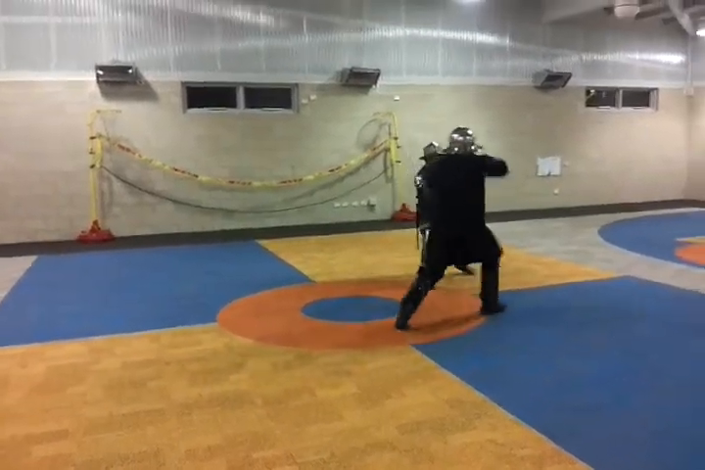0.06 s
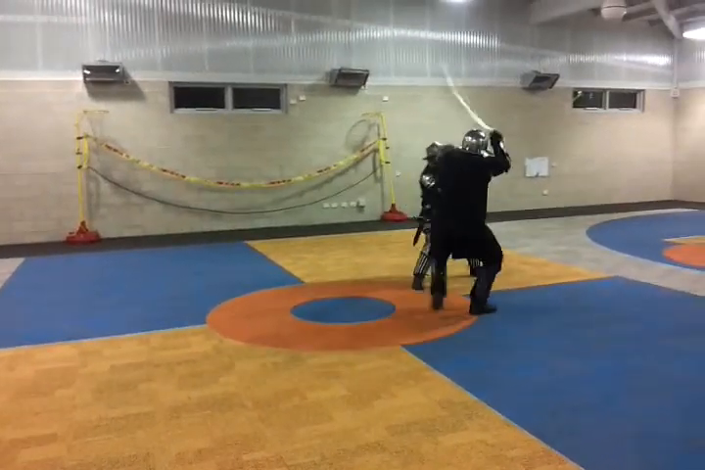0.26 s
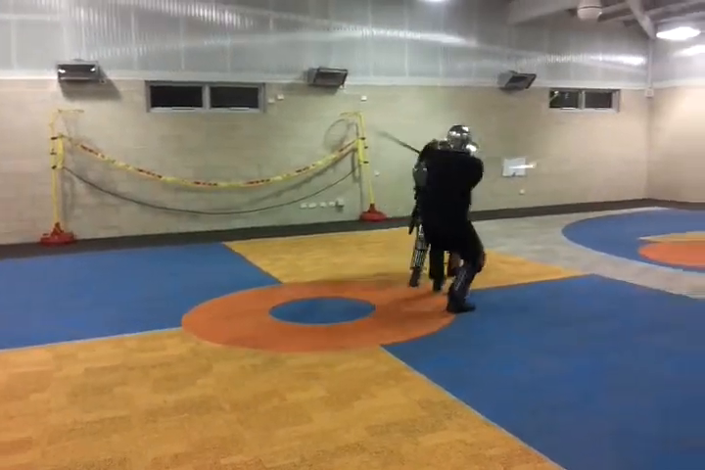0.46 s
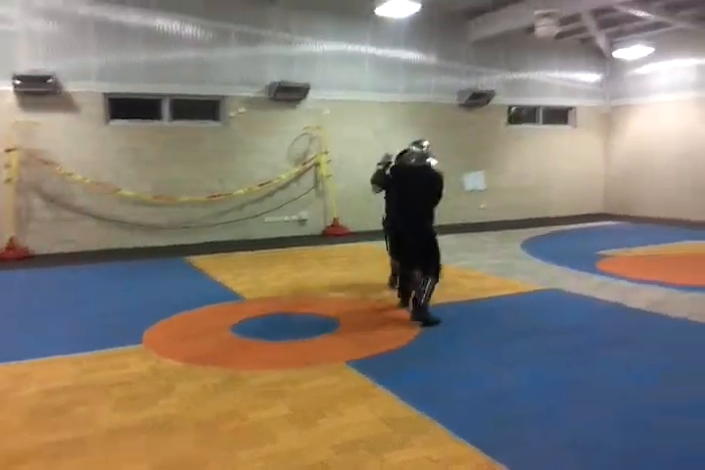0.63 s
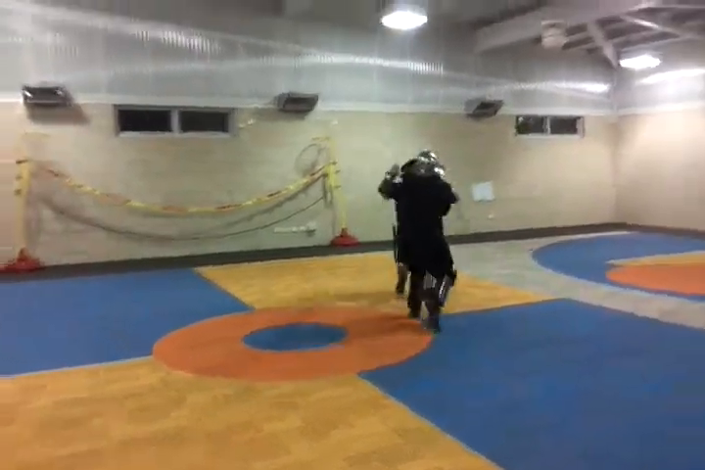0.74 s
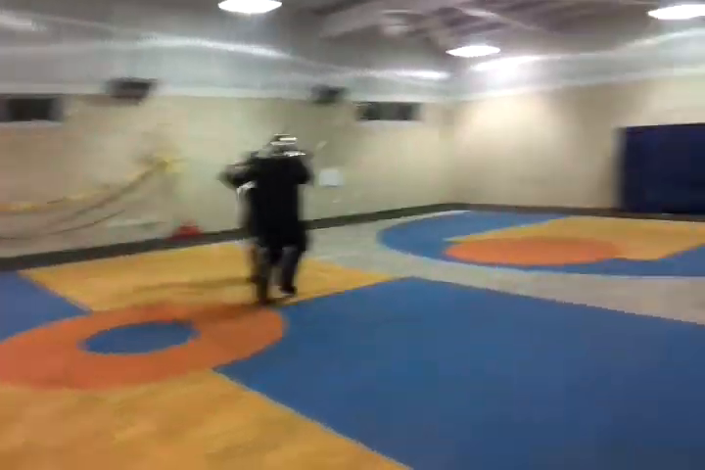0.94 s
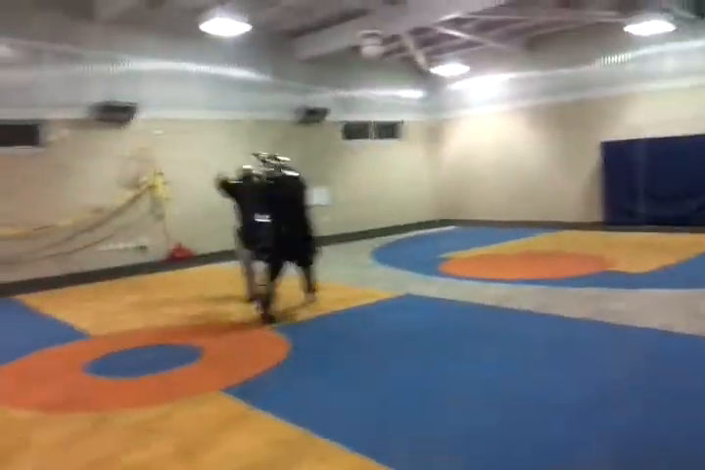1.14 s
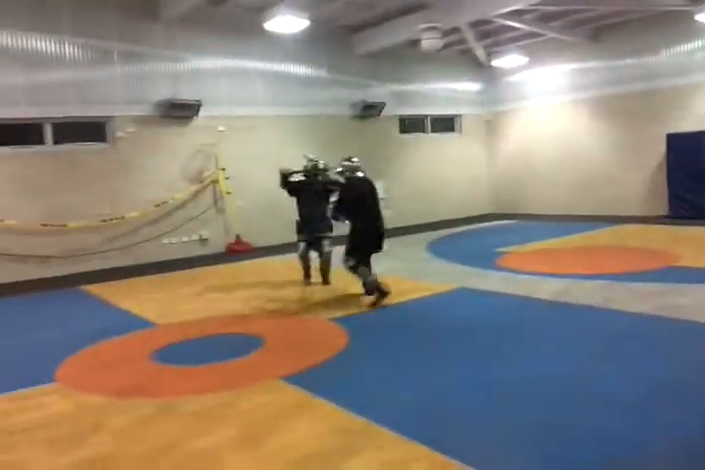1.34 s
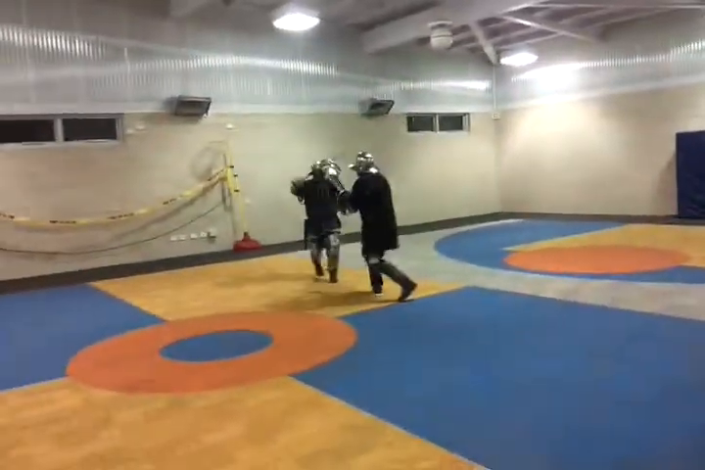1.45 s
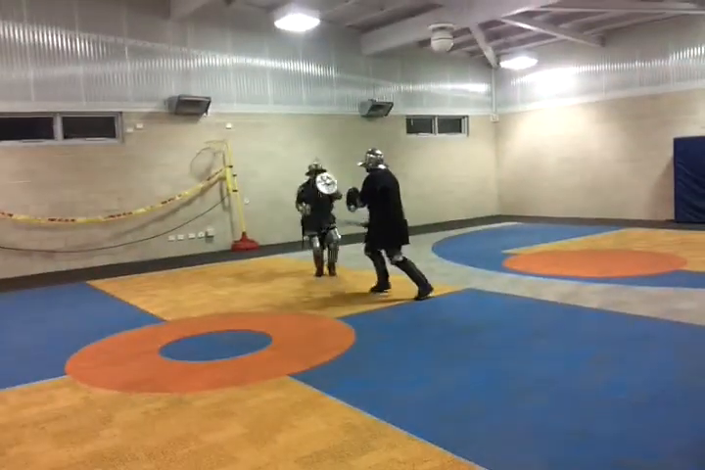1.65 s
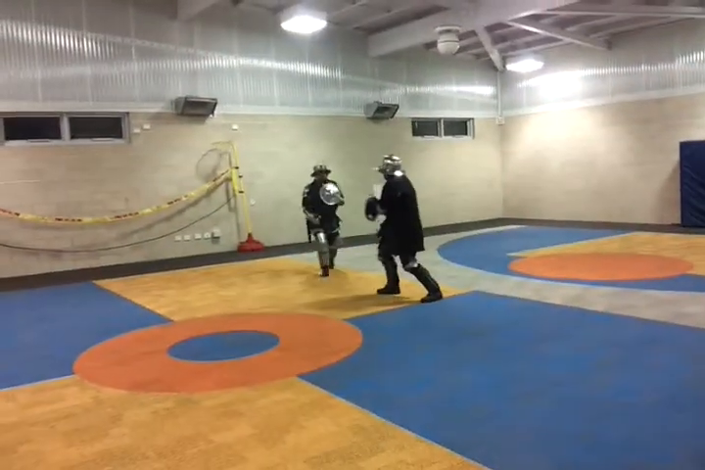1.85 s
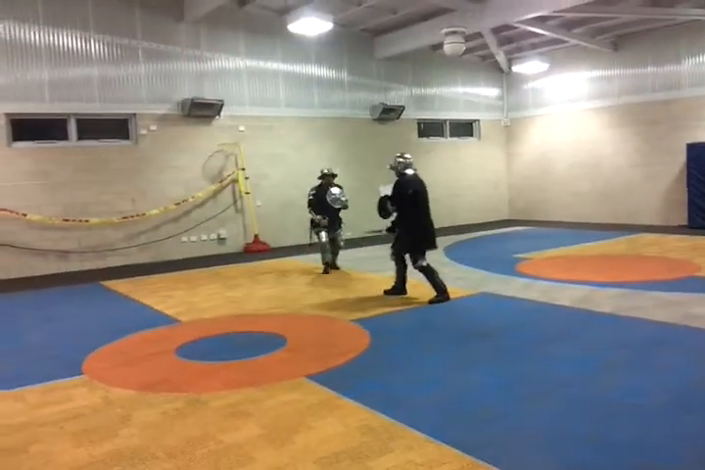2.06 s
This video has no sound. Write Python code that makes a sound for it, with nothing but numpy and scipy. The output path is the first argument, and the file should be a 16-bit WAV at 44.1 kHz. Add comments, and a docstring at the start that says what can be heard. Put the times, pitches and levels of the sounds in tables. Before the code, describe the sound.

Swords clash on steel armour in a large, echoing sports hall. After faint clinks, a loud crack on a small shield and a ringing helmet hit come at 0.25 seconds, with dull footfalls. Two blade clashes follow near 0.7, lighter plate rattles around 1, then a loud flurry from 1.2 to 1.5. The hardest blows distort slightly, and the echo fades into quiet room noise by 2 seconds.

```python
"""Cracks, rattles and ringing steel: two armoured fencers trade blows with sword and buckler.
Each blow is a contact crack, a rattle of plates and the ring of the struck steel; feet thud on the floor.
A large sports hall draws it all out into a long wash that overloads a small narrow-band recorder."""
import sys
import numpy as np
from scipy import signal
from scipy.io import wavfile

SR = 44100
rng = np.random.default_rng(int(sys.argv[2]) if len(sys.argv) > 2 else 0)


def to_wav(sig):
    """Store sig (one row per channel, or 1-D mono) as 16-bit WAV at the path in sys.argv[1].

    Samples outside -1..1 are clipped; the rate is SR.
    """
    pcm = np.clip(np.atleast_2d(sig), -1, 1) * 32767
    pcm = np.round(pcm).astype(np.int16)
    wavfile.write(sys.argv[1], SR, pcm.T)  # frames by channels


N = 92610


def blows():
    """Steel on steel: the contact force drives a clash and a high sizzle; the struck piece rings."""
    # (time [s], piece, ring [dB], clash [dB], clash tilt [dB/octave], rattle decay [s],
    #  sizzle [dB], direct-to-reverb [dB])
    hits = [ (0.043, "buckler", -31, -29, -1, .07, -45, -18),
            (0.189, "plates", -54, -32, -2, 0.017, -46, -0.5),
            (0.238, "buckler", -8.5, 7.5, -1, 0.009, 9, 0), (0.262, "helmet", 1.5, -3.5, -1.5, 0.11, -9, 0),
            (0.677, "sword", -11, 1, 0, 0.018, -5, 3), (0.719, "sword", -8, -7, 2.5, .03, -6, 0),
            (0.944, "plates", -17, -8, 6, .02, -20, 3), (1.019, "plates", -22, -18, 2, .004, -22, 5),
            (1.178, "buckler", -1, 1, 3, .035, -1, 2), (1.234, "plates", -13, -2, 3.5, 0.09, -13.5, 0.5),
            (1.303, "other sword", -25, 5.5, 2, 0.013, 6, -0.5),
            (1.415, "other sword", -9.5, 0.5, 1.5, 0.053, -14, 3),
            (1.527, "plates", -19, -23, 1, 0.03, -7, 1)]
    # spectra (frequency [Hz], level [dB])
    clash_spectrum = [(40, -50), (110, -28), (300, -5), (500, -3), (780, 3), (970, -3), (1230, 3),
                      (1800, -2), (2400, 0), (2950, -7), (3900, -2), (4350, -4), (5500, 0), (7000, 2),
                      (9000, -8)]
    sizzle_spectrum = [(3000, -58.5), (6500, -18.5), (8500, -8.5), (13000, 2.5), (18000, -16)]
    mix = np.zeros(N)
    for time_s, piece, ring_db, clash_db, tilt_db, rattle_s, sizzle_db, direct_db in hits:
        force = contact(rattle_s)
        clash = amp(clash_db) * unit(colour(force, clash_spectrum, tilt_db))
        sizzle = amp(sizzle_db) * unit(colour(force, sizzle_spectrum))
        ring = amp(ring_db) * steel_ring(piece)
        add(mix, time_s, hall(ring + clash + sizzle, direct_db))
    return mix


def contact(rattle_s, crack_s=.003, crack_db=-1, grain_db=3):
    """Force of a blow: a short crack and the grainy rattle of loose plates."""
    t = np.arange(SR) / SR
    crack, rattle, grain = rng.standard_normal((3, SR))
    rattle *= amp(grain_db * np.repeat(grain, 128)[:SR])  # new level every 2.9 ms
    return amp(crack_db) * unit(crack * np.exp(-t / crack_s)) + unit(rattle * np.exp(-t / rattle_s))


def steel_ring(piece, split_ratio=0.00472):
    """Decaying modes of one piece of steel, each three close partials that beat."""
    # modes by piece (frequency [Hz], level [dB], t60 [s])
    modes = { "buckler": [(1116, -9, .4), (1346, -6, .3), (1375, 0, .4), (1576, -3, .4), (3925, -6, .2),
             (4160, -9, .2), (4596, -7, .2), (5845, -5, .15), (6215, -5, .15), (6740, -6, .15),
             (7000, -5, .1)], "helmet": [(1113, -8, .5), (1280, -5, .4), (1345, -6, .5), (1375, -8, .4),
             (2126, -12, .3), (2328, 2, .8), (2375, -6, .3), (2435, -4, .6), (2580, -2, .6),
             (2700, -12, .2), (3560, -15, .5)], "sword": [(743, -12, .4), (1196, -3, .4), (1501, -2, .5),
             (2325, -10, .3), (3187, -14, .1), (5060, -6, .15), (5376, -4, .3), (5620, -6, .2),
             (5843, -1, .4), (5915, -3, .2), (6373, -2, .4)], "plates": [(1170, -10, .3), (2450, -8, .3),
             (3958, -3, .1), (4576, -3, .1), (4989, -6, .2), (5342, -6, .2), (6175, -3, .12),
             (6719, 0, .12), (6995, -1, .12)], "other sword": [(1276, -2, .5), (2202, -5, .7),
             (3655, -7, .6), (3951, -7, .4), (4290, -8, .6), (4834, -7, .3), (5130, -5, .3), (5421, -3, .3),
             (5679, -4, .4), (6121, -3, .3), (6276, 0, .4), (6374, -1, .5)]}
    t = np.arange(SR) / SR
    ring = np.zeros(SR)
    for hz, db, t60_s in modes[piece]:
        detune, phase = rng.uniform(-1.012, 1, (2, 3, 1))
        partials = np.sin(2 * np.pi * (hz * (1 + split_ratio * detune) * t + phase)).sum(0)
        ring += amp(db) * unit(amp(-60 * t / t60_s) * partials)
    return unit(ring)


def thuds(decay_s=.015):
    """Footfalls and body knocks: short, dull noise bursts."""
    # (time [s], level [dB], direct-to-reverb [dB])
    knocks = [(0.12, -27, -19), (0.24, -8, 3), (0.372, -6.5, 2), (0.677, -22, 14), (1.47, -18.5, 5)]
    # (frequency [Hz], level [dB])
    thud_spectrum = [(25, -5), (100, -20.5), (230, -10.5), (480, -10.5), (800, -11), (1500, -20),
                     (4000, -20.5)]
    t = np.arange(SR // 4) / SR
    mix = np.zeros(N)
    for time_s, db, direct_db in knocks:
        burst = rng.standard_normal(len(t)) * np.exp(-t / decay_s)
        thud = amp(db) * unit(colour(burst, thud_spectrum))
        add(mix, time_s, hall(thud, direct_db))
    return mix


def hall(x, direct_db):
    """Direct sound plus a dense tail, different for each spot on the floor."""
    # (frequency [Hz], t60 [s])
    reverb_times = [(80, .7), (300, 1.31), (800, 1.384), (1500, 1.254), (2500, 1.295), (4200, 1.246),
                    (6000, 0.97), (8000, 0.71), (13000, 0.35)]
    hz, t, noise = signal.stft(rng.standard_normal(N), SR, nperseg=256)
    decay = amp(-60 * t / log_interp(reverb_times, hz)[:, None])
    impulse_response = unit(signal.istft(noise * decay, SR, nperseg=256)[1][:N])
    impulse_response[0] += amp(direct_db)
    return signal.fftconvolve(x, impulse_response)[:N]


def hall_air(rms_db=-34.5):
    """Quiet, steady background noise of the hall."""
    # (frequency [Hz], level [dB])
    air_spectrum = [(25, -26), (90, -7.5), (200, -9.5), (800, -7.5), (1600, -14.5), (3000, -16),
                    (6500, -19), (9000, -35)]
    return amp(rms_db) * np.sqrt(N) * unit(colour(rng.standard_normal(N), air_spectrum))


def amp(db):
    """Decibels to gain."""
    return 10 ** (np.asarray(db) / 20)


def unit(x):
    """Scale to unit energy."""
    return x / np.sqrt(np.sum(x ** 2) + 1e-20)


def log_interp(points, hz):
    """Interpolate a table over log frequency."""
    points_hz, values = np.transpose(points)
    return np.interp(np.log(hz + 1), np.log(points_hz + 1), values)


def add(mix, time_s, sound):
    """Mix a sound in at time_s."""
    part = mix[round(time_s * SR):][:len(sound)]
    part += sound[:len(part)]


def colour(x, spectrum, tilt_db=0):
    """Minimum-phase filter, tilted by tilt_db per octave above 500 Hz about a 2 kHz pivot."""
    hz = abs(np.fft.fftfreq(4096, 1 / SR))
    octaves = np.log2(np.maximum(hz, 500) / 2000)
    log_gain = np.log(amp(log_interp(spectrum, hz) + tilt_db * octaves))
    taps = np.fft.ifft(np.exp(np.conj(signal.hilbert(log_gain)))).real
    return signal.fftconvolve(x, taps[:len(taps) // 2])[:len(x)]


def scene():
    """Blows and thuds in the hall, over its background; mono."""
    impacts = (blows() + thuds()) * np.sqrt(SR / 10)  # unit energy to unit RMS over 0.1 s
    return (impacts + hall_air())[None]


def record(dry, overload=.84, asymmetry=.04, ceiling=.72, cutoff_hz=16000):
    """The input clips unevenly, the narrow band drops most of the sizzle, and the peaks clip again."""
    # recorder response (frequency [Hz], gain [dB])
    response = [(8, -20.5), (30, -10), (6500, -3), (7100, -5.5), (7550, -12), (8000, -20.5), (8600, -19.5),
                (9300, -44), (11000, -103.5)]
    clipped = np.clip(dry[0], -overload * (1 - asymmetry), overload * (1 + asymmetry))
    reclipped = np.clip(colour(clipped, response), -ceiling, ceiling)
    lowpass = signal.firwin(511, cutoff_hz, window=("kaiser", 9), fs=SR)
    return signal.fftconvolve(reclipped, lowpass, "same")[None]


dry = scene()
out = record(dry)
to_wav(out)
```